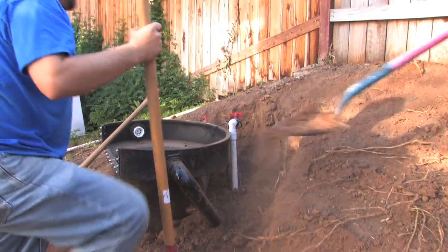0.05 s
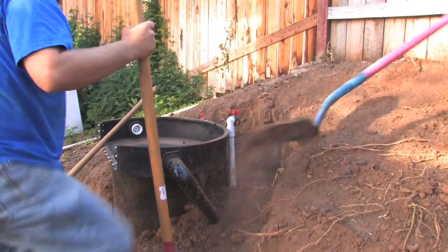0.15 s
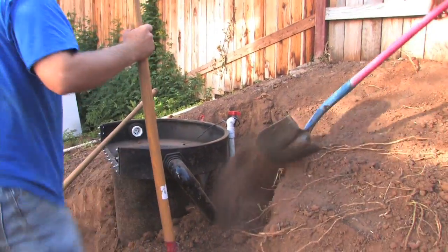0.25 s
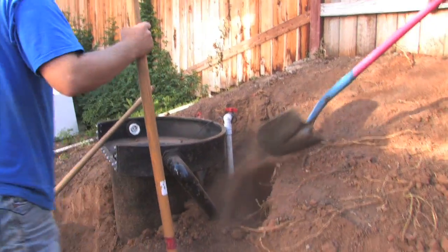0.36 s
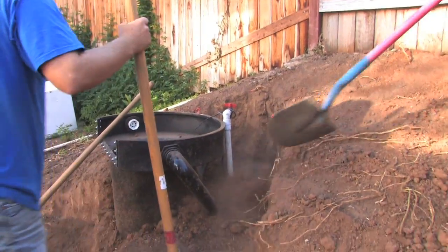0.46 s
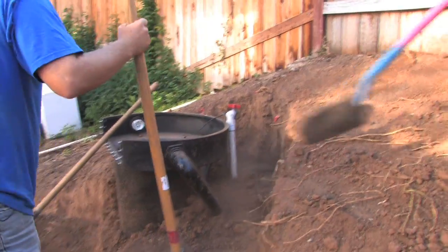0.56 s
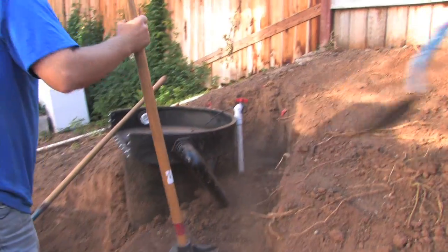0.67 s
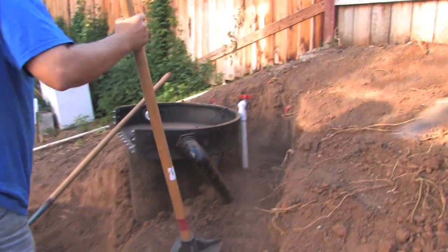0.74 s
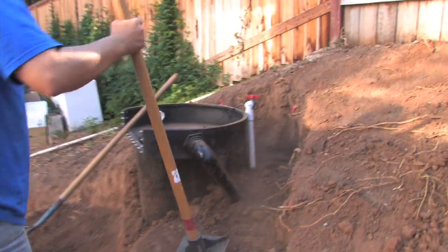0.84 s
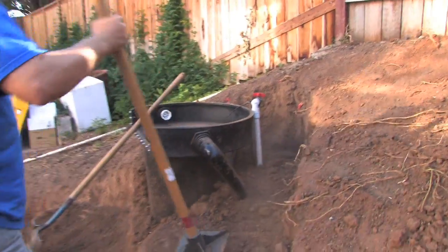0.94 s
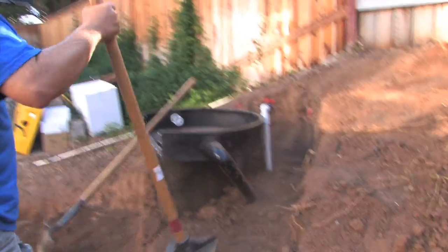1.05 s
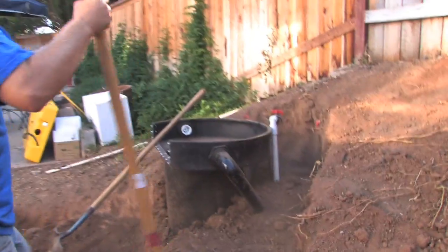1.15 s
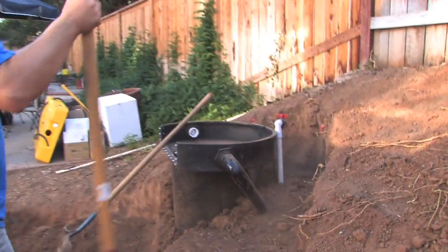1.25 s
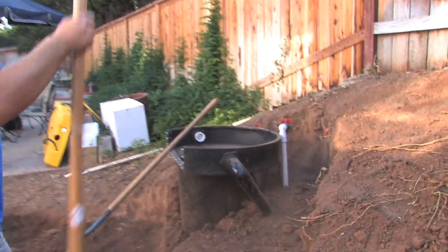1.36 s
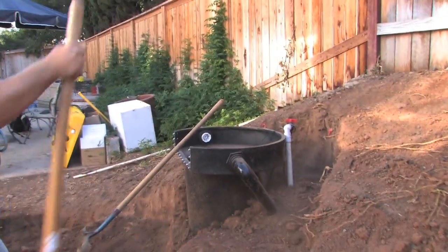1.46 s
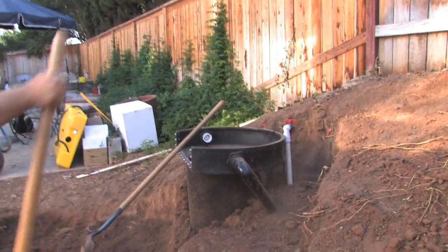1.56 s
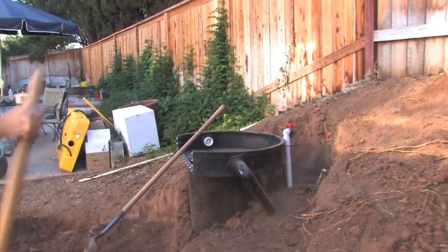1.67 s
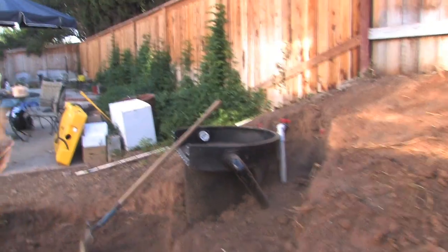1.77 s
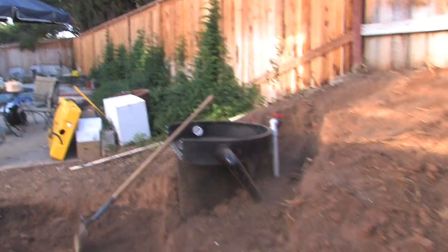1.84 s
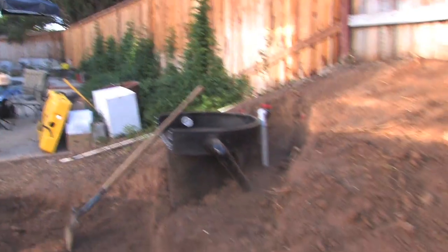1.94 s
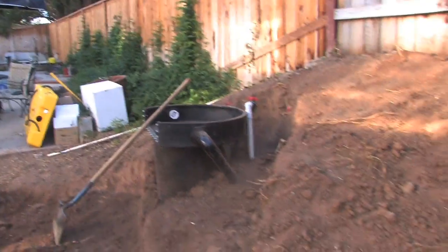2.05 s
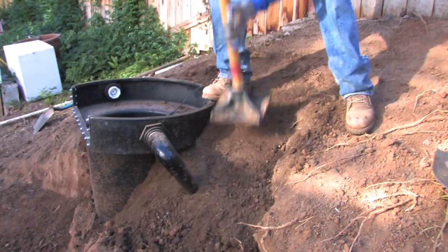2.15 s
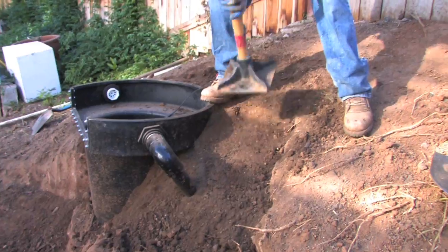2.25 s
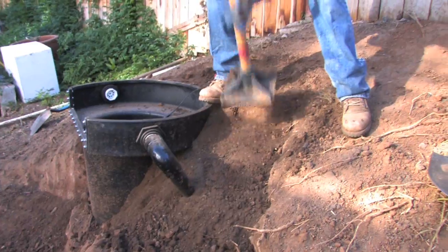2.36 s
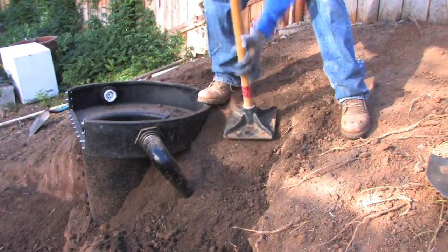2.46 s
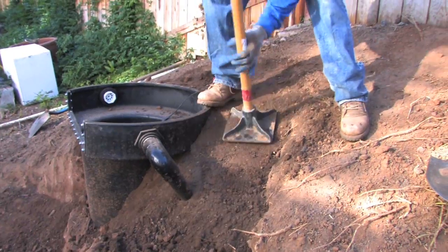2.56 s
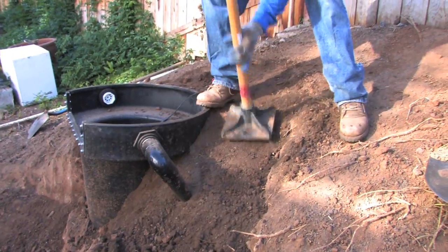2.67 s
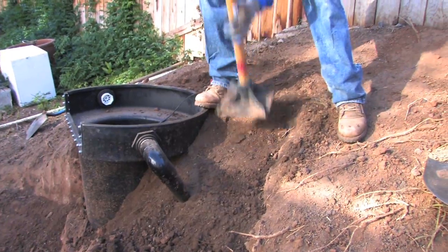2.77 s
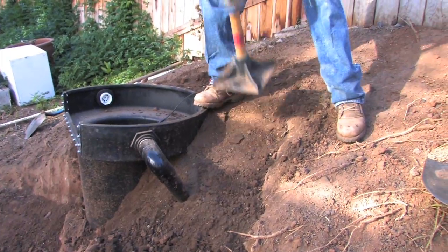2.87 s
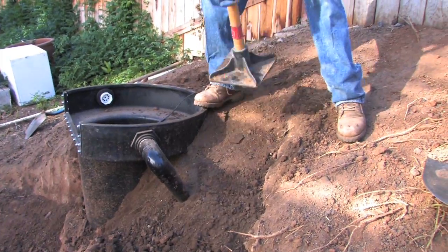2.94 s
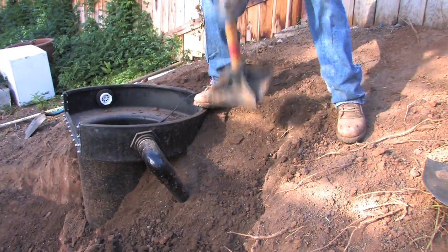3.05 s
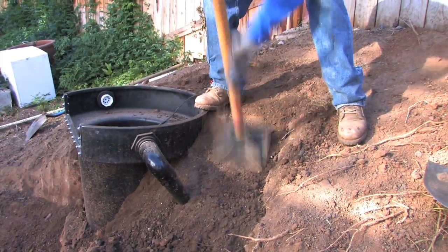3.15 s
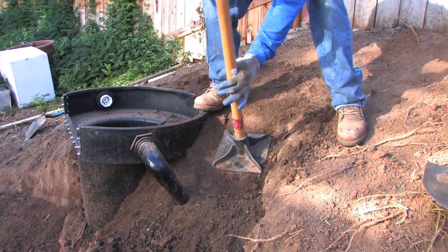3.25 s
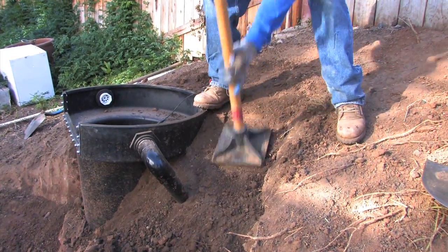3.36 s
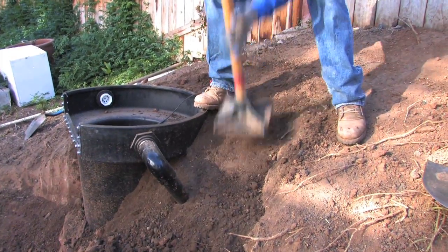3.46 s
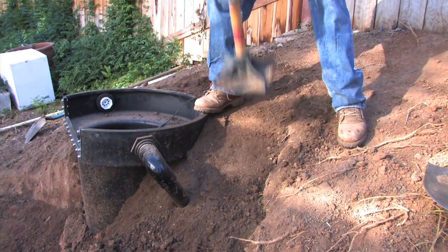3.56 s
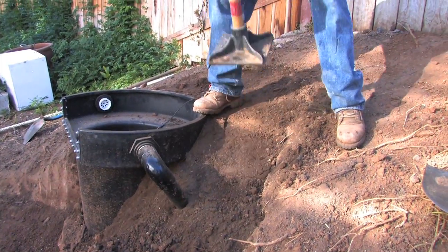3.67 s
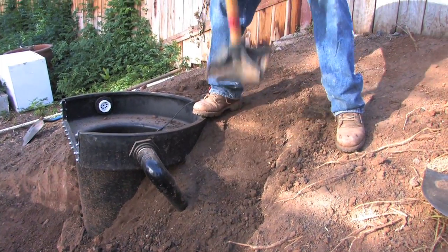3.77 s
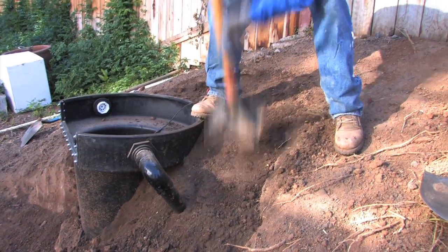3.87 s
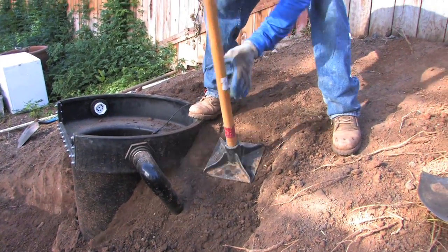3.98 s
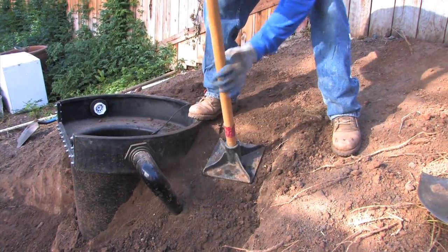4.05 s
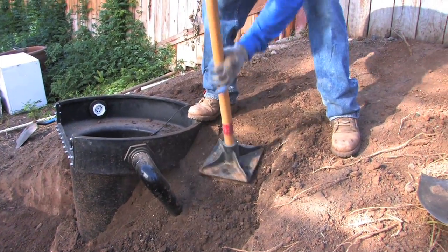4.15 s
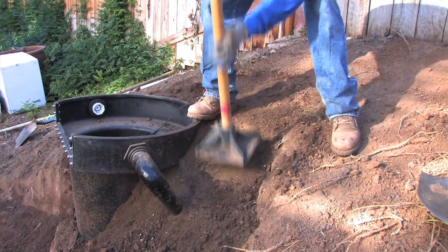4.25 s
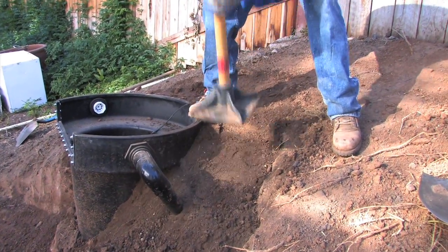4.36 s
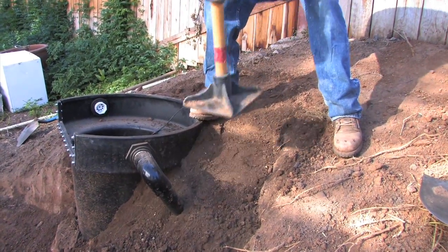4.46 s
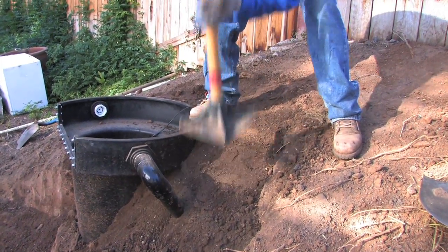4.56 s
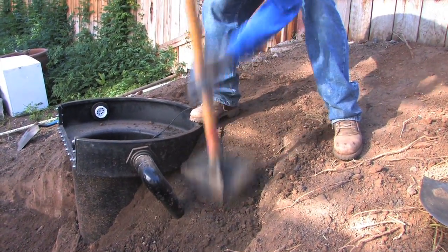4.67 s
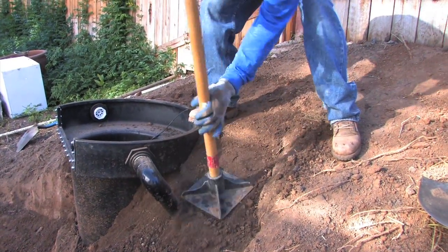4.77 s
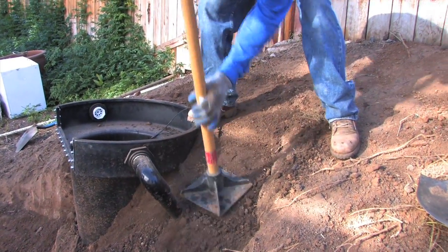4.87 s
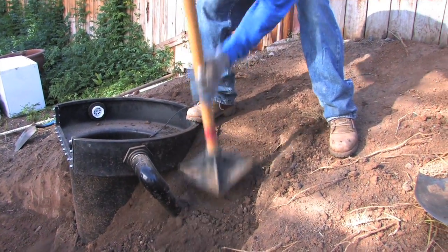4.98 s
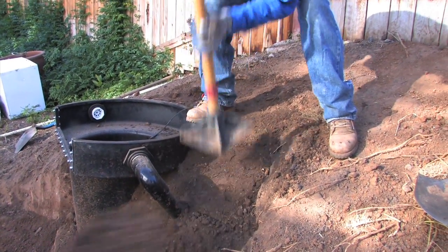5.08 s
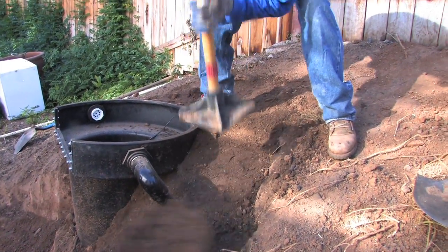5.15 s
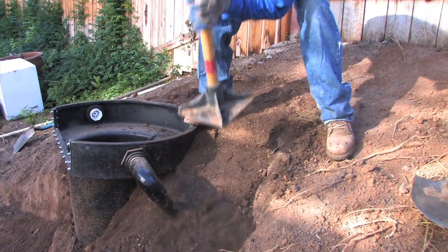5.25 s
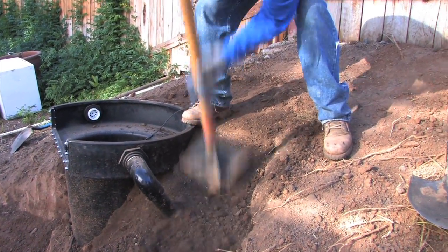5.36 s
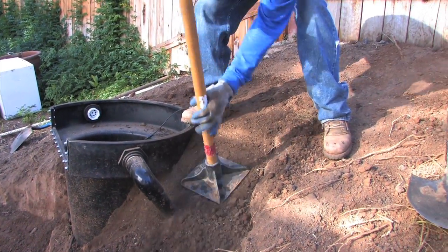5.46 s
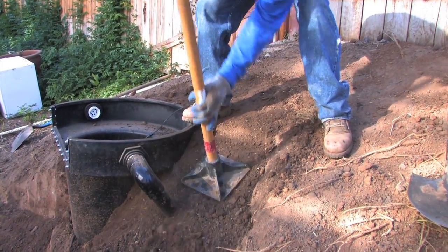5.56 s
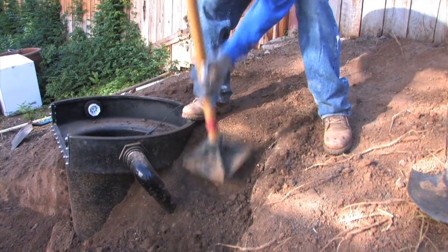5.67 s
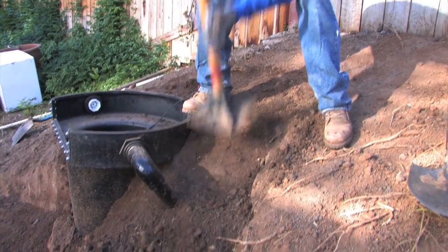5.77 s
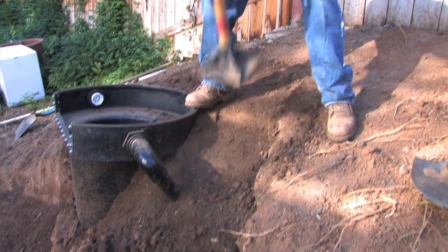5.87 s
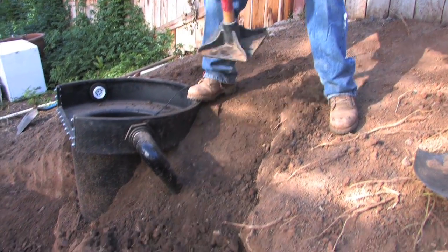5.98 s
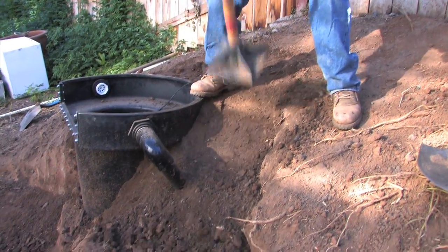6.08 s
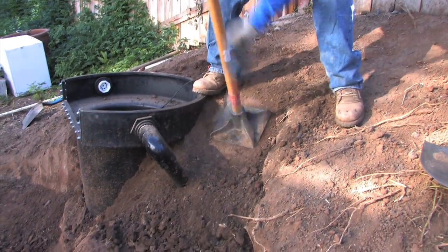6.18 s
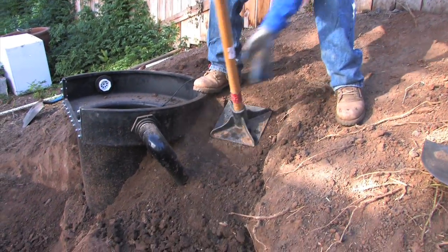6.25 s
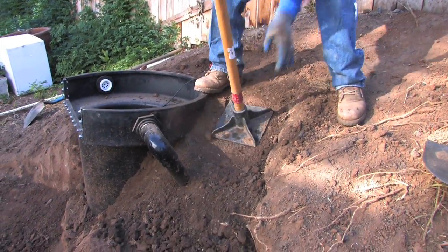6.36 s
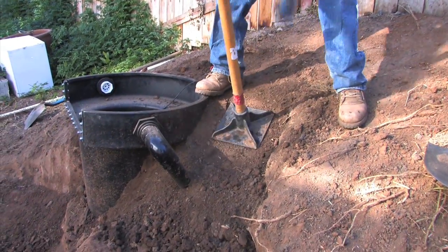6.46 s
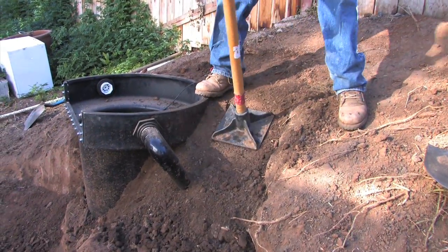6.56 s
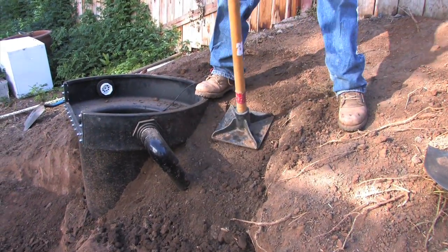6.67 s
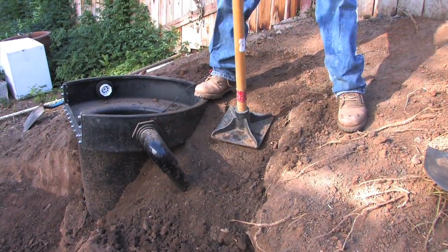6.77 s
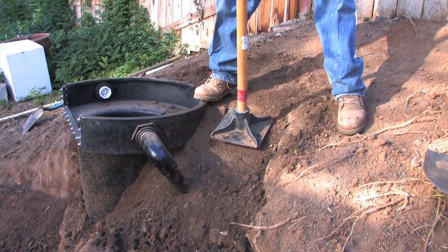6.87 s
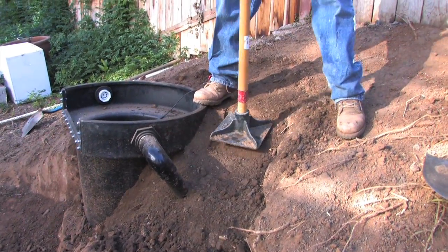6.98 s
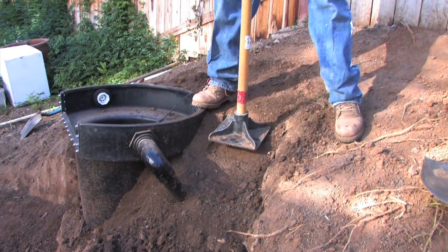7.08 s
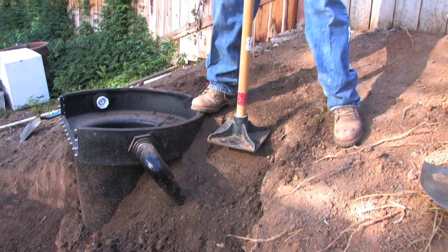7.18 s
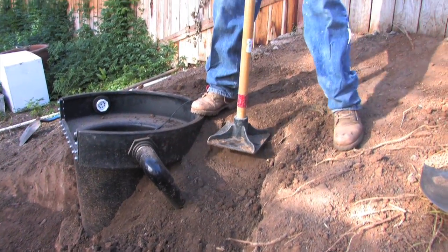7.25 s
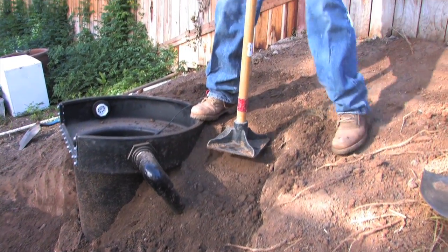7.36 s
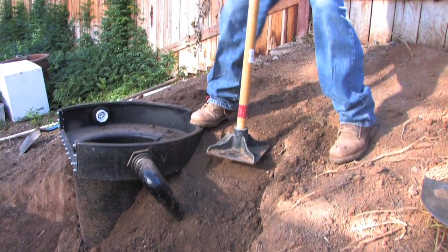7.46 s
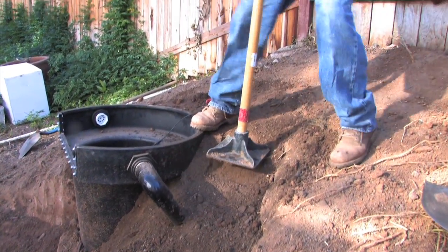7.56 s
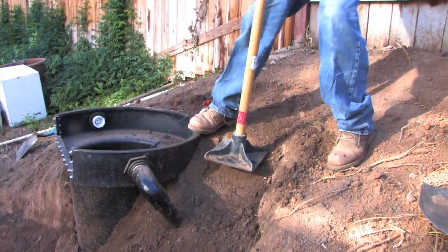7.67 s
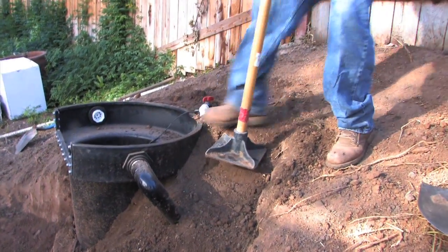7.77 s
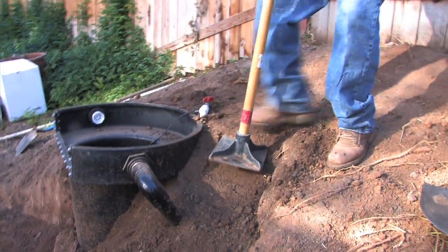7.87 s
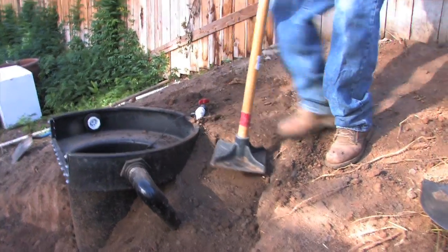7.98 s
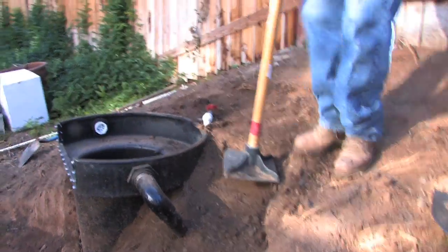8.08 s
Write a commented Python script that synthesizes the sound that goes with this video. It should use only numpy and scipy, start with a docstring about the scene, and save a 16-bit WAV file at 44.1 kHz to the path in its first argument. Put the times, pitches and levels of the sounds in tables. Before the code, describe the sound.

In an open fenced yard, a few steps from the microphone, a shovelful of soil pours with clinks and one hard woody knock, then the blade bites grittily into the heap. Around two seconds the digging wash stops and a heavy hand tamper thuds about every three-quarters of a second, a buried hollow tank booming beneath each blow. Sand trickles, gloves rustle, and finally the steel plate clanks and scuffs over grit.

```python
"""Backfilling around a buried tank

A fenced yard, heard from a few steps away, around a hollow plastic tank in a trench.
A shovel tips soil, clinks, knocks and bites into the heap: blade modes, shaped noise and clumped grains.
Then a steel hand tamper thuds on loose fill; noise and decaying modes make the tank boom, and sand trickles.
The plate clanks and scuffs over grit, mostly late; throughout, a faint whine and a soft hiss come and go."""
import sys
import numpy as np
from scipy import signal
from scipy.fft import rfft, irfft, next_fast_len
from scipy.io import wavfile
from scipy.ndimage import uniform_filter1d

SR = 44100
rng = np.random.default_rng(int(sys.argv[2]) if len(sys.argv) > 2 else 0)


def wav_record(signal):
    """Record a signal, one row per channel, as 16-bit PCM in the file named by sys.argv[1]."""
    frames = np.transpose(np.atleast_2d(signal))
    bounded = np.clip(frames, -1, 1)
    # unit amplitude maps onto the largest positive 16-bit level
    quanta = np.round(bounded * 32767).astype(np.int16)
    wavfile.write(sys.argv[1], SR, quanta)


N = 358170
AGE = np.arange(SR) / SR   # seconds since an event began


def from_db(db):
    """Decibels to gain."""
    return 10 ** (np.asarray(db) / 20)


def rms_one(x):
    """Scale to rms 1."""
    return x / np.sqrt(np.mean(x ** 2) + 1e-20)


def in_time(rows):
    """The columns of a curve at every sample."""
    s, *columns = np.transpose(rows)
    return [np.interp(np.arange(N) / SR, s, c) for c in columns]


def add(track, s, sound):
    """Mix a sound into a track from time s."""
    start = max(round(s * SR), 0)
    track[start:start + len(sound)] += sound[:max(N - start, 0)]


def decay(t60, hold=0):
    """Full level for a while, then 60 dB down in t60."""
    return from_db(-60 * np.maximum(AGE - hold, 0) / t60)


def swell(rise):
    """A straight rise to full level."""
    return np.minimum(AGE / rise, 1)


def coloured(x, spectrum, tilt_db=0):
    """Give white noise or grains a spectrum, tilted per octave; rms 1."""
    hz, db = np.transpose(spectrum)
    size = next_fast_len(len(x))
    octave = np.log2(np.maximum(np.fft.rfftfreq(size, 1 / SR), 1))
    level_db = np.interp(octave, np.log2(hz), db)
    # the tilt acts only above the second point; below the first the level falls 20 dB per octave
    level_db += tilt_db * np.maximum(octave, np.log2(hz[1]))
    level_db -= 20 * np.maximum(np.log2(hz[0]) - octave, 0)
    return rms_one(irfft(rfft(x, size) * from_db(level_db), size)[:len(x)])


def noise(spectrum, size=SR):
    """Smooth noise with a spectrum; rms 1."""
    return coloured(rng.standard_normal(size), spectrum)


def grains(per_s, spread_db, size=SR):
    """Random tiny collisions, many small and a few large; rms 1."""
    sizes = from_db(spread_db * np.minimum(rng.exponential(1, size), 4))
    happens = rng.random(size) < per_s / SR
    return rms_one(sizes * rng.choice([-1, 1], size) * happens)


def clumps(spread_db, size=SR):
    """Soil gives way in lumps: a gain that lurches every few milliseconds."""
    lurch = uniform_filter1d(rng.standard_normal(size), size=240)
    lurch = uniform_filter1d(lurch, size=120)
    return from_db(spread_db * rms_one(lurch))


def struck(modes):
    """A body's modes ringing, each strength depending a little on where the blow lands."""
    out = np.zeros(SR)
    for strength_db, (hz, db, t60) in zip(rng.uniform(-2, 2, len(modes)), modes):
        out += from_db(strength_db + db) * np.sin(2 * np.pi * hz * AGE) * decay(t60)
    return out


def shove(contact, order=8):
    """A brief push on the ground, the curvature of a skewed hump: a dip, then a crest of height 1."""
    t = AGE * np.sqrt(2 * order) / contact   # the crest follows the dip by about `contact`
    pressure = -np.gradient(np.gradient(t ** order * np.exp(-t)))
    return pressure / pressure.max()


WASH_END_S, WASH_FADE_DB_PER_S = 2.16, 153


def before_drop():
    """Gain 1 until 2.16 s, then fading quickly."""
    return from_db(-WASH_FADE_DB_PER_S * np.maximum(np.arange(N) / SR - WASH_END_S, 0))


# Open air of the yard. Each row: frequency in Hz, relative density in dB per Hz.
AIR_SPECTRUM = [(40, -18), (130, 3.5), (220, 3), (450, 3.5), (1000, -1.5), (1500, -20), (2500, -32.5),
                (6000, -38.5), (16000, -34)]
# Broad outdoor wash of the first seconds. Each row: frequency in Hz, relative density in dB per Hz.
WASH_SPECTRUM = [(40, -6), (95, 1), (132, 9), (170, -4), (280, 0), (480, -2), (900, -8), (1500, -16),
                 (2500, -27), (6000, -36), (16000, -42.5)]
# Distant low rumble. Each row: frequency in Hz, relative density in dB per Hz.
RUMBLE_SPECTRUM = [(20, -26.5), (45, -19), (62, -3), (78, -1.5), (105, -5.5), (160, -10.5), (300, -23.5),
                   (1000, -70)]
AIR_DB, WASH_DB, RUMBLE_DB = -61, -45.5, -52.5


def yard():
    """Steady noise of open air and a distant rumble, with a broader wash that drops away at 2.16 s."""
    air = from_db(AIR_DB) * noise(AIR_SPECTRUM, size=N)
    wash = from_db(WASH_DB) * before_drop() * noise(WASH_SPECTRUM, size=N)
    return air + wash + from_db(RUMBLE_DB) * noise(RUMBLE_SPECTRUM, size=N)


# Spells of soft high hiss. Each row: start in seconds, length in seconds, level in dB.
HISS_SPELLS = [(1.112, 0.426, -54), (1.71, 0.464, -57.5), (7.285, .25, -65)]
# Treble of the hiss. Each row: frequency in Hz, relative density in dB per Hz.
HISS_SPECTRUM = [(4500, -19), (6000, -8), (7500, -6), (9500, -3.5), (11800, -2.5), (13000, -12),
                 (16000, -12)]
HISS_RISE_S, HISS_T60_S = 0.025, 0.15


def hiss():
    """A smooth band of treble noise that comes and goes."""
    out = np.zeros(N)
    for s, length, db in HISS_SPELLS:
        spell = swell(HISS_RISE_S) * decay(HISS_T60_S, hold=length)
        add(out, s, from_db(db) * noise(HISS_SPECTRUM) * spell)
    return out


# One long glide of a thin high whine. Each row: time in seconds, pitch in Hz before smoothing.
WHINE_GLIDE = [(6.16, 6800), (6.25, 9300), (6.39, 9950), (6.505, 11140), (6.60, 10100), (6.685, 10970),
               (6.81, 9700), (6.89, 8700), (6.96, 6200)]
# Brief faint swoops of the same whine.
# Each row: time of the top in seconds, top pitch in Hz, level in dB relative to the long glide.
WHINE_SWOOPS = [(.77, 8900, -3), (2.64, 9000, -3), (7.35, 9500, -5.5)]
SWOOP_RISE_S, SWOOP_FALL_S = 0.11, 0.24   # time constants of the bell-shaped pitch arc


def whine_course():
    """Pitch and level offset: one long rounded glide and a few bell-shaped swoops."""
    hz, db = uniform_filter1d(in_time(WHINE_GLIDE)[0], size=1800), np.zeros(N)
    for s, top_hz, swoop_db in WHINE_SWOOPS:
        lag = np.arange(N) / SR - s
        arc = top_hz * np.exp(-(lag / np.where(lag < 0, SWOOP_RISE_S, SWOOP_FALL_S)) ** 2)
        db = np.where(arc > hz, swoop_db, db)
        hz = np.maximum(hz, arc)
    return hz, db


# Partials of the whine. Each row: multiple of the pitch, relative level in dB.
WHINE_CLUSTER = [(1, -1), (1.104, -7), (1.18, -15), (1.225, -14), (1.27, -9), (1.311, -18)]
WHINE_DB, WHINE_AT_HZ, WHINE_DB_PER_OCTAVE = -54.5, 9980, 34


def whine(silent_hz=7000, full_hz=8200):
    """A faint cluster of high partials gliding together, slightly unsteady, louder as it climbs."""
    hz, offset_db = whine_course()
    level_db = WHINE_DB + offset_db + WHINE_DB_PER_OCTAVE * np.log2(hz / WHINE_AT_HZ)
    gain = from_db(level_db) * np.interp(hz, [silent_hz, full_hz], [0, 1])
    flutter = rms_one(uniform_filter1d(rng.standard_normal(N), size=100))
    phase = 2 * np.pi * np.cumsum(hz * (1 + 0.00377 * flutter)) / SR
    cluster = np.zeros(N)
    for multiple, db in WHINE_CLUSTER:
        cluster += from_db(db) * clumps(1.96, size=N) * np.sin(multiple * phase)
    return gain * cluster


# Boots on soft ground nearby. Each row: start in seconds, level in dB.
BOOT_STEPS = [(0.043, -24), (.060, -35), (0.704, -37.5), (3.838, -57), (3.915, -44), (5.286, -36.5),
              (5.361, -40.5), (5.407, -45.5), (6.714, -41), (6.804, -43.5)]
# Puff of a step. Each row: frequency in Hz, relative density in dB per Hz.
STEP_SPECTRUM = [(70, -59), (200, -10), (470, 2), (700, -9), (1300, -23), (3000, -34), (9000, -50)]


def boots():
    """Dull, short pats on the soft ground: one small push and a puff of noise."""
    out = np.zeros(N)
    for s, db in BOOT_STEPS:
        push = from_db(-0.5) * shove(0.0019)
        puff = from_db(-3.5) * noise(STEP_SPECTRUM) * swell(0.0022) * decay(0.086, hold=0.0021)
        add(out, s, from_db(db) * (push + puff))
    return out


# A shovelful of sand pouring into the trench. Each row: time in seconds, level in dB.
SAND_POUR = [(0, -48.5), (.3, -41), (.55, -42.5), (.8, -69.5)]
SAND_REST_DB, SAND_EARLY_DB = -63, -57   # steady trickle, and a louder floor added before 2.16 s that drops away with the wash
SPILL_RISE_S = 0.04   # disturbed sand takes a moment to start running
# spill levels relative to the event that sets the sand running
BITE_SPILL_DB, BITE_SPILL_T60_S = -20.5, 1.43
CLANK_SPILL_DB, CLANK_SPILL_T60_S = -23, 1
SCUFF_SPILL_DB, SCUFF_SPILL_T60_S = -11, 1
STEP_SPILL_DB, STEP_SPILL_T60_S = -20.5, 0.51
TAMP_SPILL_DB, TAMP_SPILL_T60_S = -65.5, 1   # not relative: alike for every blow


def sand_flow():
    """Bites, clanks, scuffs, steps and blows add spills, in power, to the pour and a steady trickle."""
    pour_db, = in_time(SAND_POUR)
    early_power = from_db(pour_db) ** 2 + from_db(SAND_EARLY_DB) ** 2
    power = from_db(SAND_REST_DB) ** 2 + early_power * before_drop() ** 2
    spills = [(s, db + BITE_SPILL_DB, BITE_SPILL_T60_S) for s, db, *_ in HEAP_BITES]
    spills += [(s, db + CLANK_SPILL_DB, CLANK_SPILL_T60_S) for s, db, *_ in PLATE_CLANKS]
    spills += [(s, db + SCUFF_SPILL_DB, SCUFF_SPILL_T60_S) for s, db, *_ in GRIT_SCUFFS]
    spills += [(s, TAMP_SPILL_DB, TAMP_SPILL_T60_S) for s, *_ in TAMPER_BLOWS]
    for s, db, t60 in spills:
        run = swell(SPILL_RISE_S) * decay(t60, hold=SPILL_RISE_S)
        add(power, s, (from_db(db) * run) ** 2)
    for s, db in BOOT_STEPS:
        add(power, s, (from_db(db + STEP_SPILL_DB) * decay(STEP_SPILL_T60_S)) ** 2)
    return np.sqrt(power)


# Fine sliding sand. Each row: frequency in Hz, relative density in dB per Hz.
SAND_SPECTRUM = [(400, 11.5), (1500, 10.5), (2300, 6.5), (5000, 2), (7000, 0), (11000, -0.5), (16000, -3.5)]
# Single pebbles ticking. Each row: start in seconds, level in dB, t60 in seconds.
PEBBLE_TICKS = [(0.1141, -28, 0.011), (.245, -25.5, .007), (0.923, -30, 0.017), (1.6625, -17.5, 0.0026),
                (1.791, -41, .008), (4.577, -46, .015), (7.47, -24.5, .011)]
# Tick of a pebble or a catching grip. Each row: frequency in Hz, relative density in dB per Hz.
TICK_SPECTRUM = [(300, 2), (1200, 0.5), (2800, 8), (4000, 0.5), (6500, 2.5), (8500, -9.5), (16000, -17)]


def loose_soil():
    """Sand slides in fine grains while single crumbs and pebbles tick."""
    sand = coloured(grains(7600, 2.7, size=N), SAND_SPECTRUM)
    out = sand_flow() * sand * clumps(0.65, size=N)
    for s, db, t60 in PEBBLE_TICKS:
        add(out, s, from_db(db) * noise(TICK_SPECTRUM) * decay(t60))
    return out


# The grip slides along the handle and catches.
# Each row: time of the catch in seconds, slide length in seconds, slide level in dB, catch level in dB.
GRIP_SHIFTS = [(3.429, 0.092, -59.5, -40.5), (4.222, 0.073, -56, -42.5), (4.393, .13, -56, -44),
               (4.449, 0.047, -59, -51), (5.066, 0.16, -61, -42.5), (5.852, 0.23, -63, -54),
               (6.055, 0.053, -59.5, -46.5)]
# Rustle of the sliding grip. Each row: frequency in Hz, relative density in dB per Hz.
RUB_SPECTRUM = [(800, 5), (1500, 10), (2100, 2), (2900, 6.5), (4300, 5.5), (5500, -18), (6900, 10),
                (7900, -25), (16000, -3)]
CATCH_T60_S = 0.05


def gloves():
    """Short, uneven rustles of grains as the grip shifts, each with a small catch as it ends."""
    out = np.zeros(N)
    for s, length, slide_db, catch_db in GRIP_SHIFTS:
        rustle = coloured(grains(3000, 4.2), RUB_SPECTRUM) * clumps(3.8)
        rustle = rustle * swell(length / 2) * decay(0.2, hold=length)
        add(out, s - length, from_db(slide_db) * rustle)
        add(out, s, from_db(catch_db) * noise(TICK_SPECTRUM) * decay(CATCH_T60_S))
    return out


# The tamper is lifted. Each row: start in seconds, level in dB.
LIFTS = [(5.075, -40.5)]
# Modes of the lifted tamper. Each row: frequency in Hz, level in dB, t60 in seconds.
LIFTED_STEEL = [(1555, 0, 0.26), (4400, -11.5, 0.25)]


def faint_ring():
    """A brief, faint metallic note of two modes as the tamper is lifted."""
    out = np.zeros(N)
    for s, db in LIFTS:
        add(out, s, from_db(db) * struck(LIFTED_STEEL) * swell(0.02))
    return out


# Grit on steel. Each row: frequency in Hz, relative density in dB per Hz.
GRIT_SPECTRUM = [(150, -14.5), (500, -3), (1000, -1), (2000, -1.5), (3200, -3), (5000, -5), (9000, -5),
                 (13000, -10), (16000, -17)]


def scrapes(strokes, modes, lumpy_db):
    """Grit rasps along steel: clumped grains, heard directly and through the metal's modes."""
    out = np.zeros(N)
    for s, db, rise, hold, t60, tilt_db, ring_db in strokes:
        stroke = swell(rise) * decay(t60, hold) * clumps(lumpy_db)
        rasp = coloured(grains(4500, 3.6), GRIT_SPECTRUM, tilt_db) * stroke
        ringing = signal.fftconvolve(rasp, struck(modes))[:SR]
        ringing = rms_one(ringing) * np.std(rasp)   # as strong as the rasp
        add(out, s, from_db(db - 3) * (rasp + from_db(ring_db) * ringing))
    return out


# The shovel bites into the heap. Each row: start in seconds, level in dB (scraped 3 dB lower),
# t60 in seconds, brightness in dB per octave.
HEAP_BITES = [(.879, -35.5, 0.42, -4.5), (1.376, -27.5, .19, -2), (1.742, -26, 0.25, -0.7),
              (1.79, -30.5, 0.15, -1)]
BITE_RISE_S, BITE_HOLD_S, BITE_RING_DB = 0.0009, 0.012, -7.5
# Soil slides along the blade. Each row: start in seconds, level in dB (scraped 3 dB lower),
# length in seconds, brightness in dB per octave, metal ring in dB relative to the rasp.
SOIL_SLIDES = [(0.217, -43.5, 0.11, -2, 7), (0.268, -33, .12, 2, -2), (.895, -31, 0.033, 3, -15),
               (1.199, -49, 0.11, -1.5, -15)]
SLIDE_RISE_SHARE, SLIDE_T60_S = 0.68, 0.24   # the rise is a share of the length
# Shovel blade. Each row: frequency in Hz, level in dB, t60 in seconds.
BLADE_MODES = [(948, -11.5, 0.18), (1555, -5, 0.071), (1820, -11, 0.088), (2280, -11, 0.102),
               (3340, -5.5, 0.057), (4000, -5, 0.044), (4240, -19, 0.14), (4694, -28, 0.26),
               (5070, -24, 0.16), (5410, -3.5, 0.058), (6000, -3, .08), (7100, -14.5, 0.076),
               (8070, -5, .06), (10540, -1, 0.049), (11080, -12, 0.045), (14000, -4, 0.087),
               (14400, -9, .05)]


def blade_scrapes():
    """A bite starts at once and dies away; sliding soil swells for most of its length."""
    strokes = []
    for s, db, t60, tilt_db in HEAP_BITES:
        strokes.append((s, db, BITE_RISE_S, BITE_HOLD_S, t60, tilt_db, BITE_RING_DB))
    for s, db, length, tilt_db, ring_db in SOIL_SLIDES:
        rise = SLIDE_RISE_SHARE * length
        strokes.append((s, db, rise, length, SLIDE_T60_S, tilt_db, ring_db))
    return scrapes(strokes, BLADE_MODES, lumpy_db=3.0)


# Stones on the blade. Each row: start in seconds, level in dB.
STONE_CLINKS = [(0.172, -36.5), (0.197, -24)]
# Hard knocks of shovel and falling clods. Each row: start in seconds, level in dB.
HARD_KNOCKS = [(.552, -12), (.625, -27), (.642, -46), (.696, -40), (.749, -40.5)]
# Crack of a knock. Each row: frequency in Hz, relative density in dB per Hz.
KNOCK_SPECTRUM = [(150, -44), (350, -26), (560, -3), (800, -0.5), (1100, 1), (1350, -7), (1900, -7),
                  (2700, -20), (4200, -18.5), (5600, -28), (7500, -50), (16000, -42.5)]
# Woody body of a knock. Each row: frequency in Hz, level in dB, t60 in seconds.
KNOCK_BODY = [(586, -13.5, 0.23), (766, -3.5, 0.086), (931, -6, 0.053), (1130, 3, 0.059),
              (1518, -12.5, 0.023)]


def shovel():
    """Stones ring the blade; knocks are short and woody, duller when weak, with a faint fence tail."""
    out = np.zeros(N)
    for s, db in STONE_CLINKS:
        grit = from_db(-2) * noise(GRIT_SPECTRUM) * decay(0.038)
        add(out, s, from_db(db) * (struck(BLADE_MODES) + grit))
    for s, db in HARD_KNOCKS:
        crack = coloured(rng.standard_normal(SR), KNOCK_SPECTRUM, tilt_db=0.33 * (db + 11.5))
        fence_tail = from_db(-15.5) * decay(0.31)
        crack = crack * swell(0.00049) * (decay(0.048, hold=0.0025) + fence_tail)
        body = from_db(-7) * struck(KNOCK_BODY) * swell(0.0017)
        add(out, s, from_db(db) * (body + crack))
    return out


# The plate drops or rocks onto grit. Each row: start in seconds, grit level in dB (scraped 3 dB lower),
# plate ring level in dB, grit t60 in seconds, brightness in dB per octave.
PLATE_CLANKS = [(5.483, -32.5, -46, 0.086, -6.5), (6.337, -29.5, -31, 0.14, -5.5),
                (6.468, -34.5, -49, 0.12, -2.5), (7.396, -36, -36, 0.063, -4),
                (7.470, -31, -26.5, 0.36, -2.5), (7.553, -36.5, -35, 0.22, -2)]
CLANK_RISE_S, CLANK_HOLD_SHARE, CLANK_RING_DB = 0.0038, 0.1, -5.5   # grinds for a share of its t60
# Plate and boots scuff over grit. Each row: start in seconds, level in dB (scraped 3 dB lower),
# length in seconds, metal ring in dB relative to the rasp.
GRIT_SCUFFS = [(2.221, -52, 0.055, -12), (2.388, -51, 0.12, -21), (5.075, -47.5, 0.011, -14),
               (5.285, -54.5, 0.012, -12), (6.401, -42, 0.0078, -14), (6.94, -52, 0.067, -3.5),
               (7.406, -42.5, .04, -13), (7.744, -51, 0.064, 3.5), (7.826, -45.5, 0.036, -24),
               (7.98, -52, 0.054, -2), (8.067, -49.5, 0.067, 2)]
SCUFF_RISE_SHARE, SCUFF_T60_S, SCUFF_TILT_DB = 0.18, 0.27, -0.9   # share of the length; s; dB per octave
# Tamper plate. Each row: frequency in Hz, level in dB, t60 in seconds.
PLATE_MODES = [(503.5, -18.5, 0.43), (771, -16, 0.13), (938, -2, 0.038), (1504, 8.5, 0.031),
               (1555, -15.5, 0.26), (1740, -5.5, 0.026), (2162, -10.5, 0.17), (2740, -9, 0.023),
               (4080, -21, 0.28), (4560, -37, 0.098), (6450, -18, 0.058)]


def plate_scrapes():
    """A clank strikes the plate and grinds grit; a scuff swells and rasps, ringing without a strike."""
    clanks, scuffs = [], []
    for s, db, _, t60, tilt_db in PLATE_CLANKS:
        clanks.append((s, db, CLANK_RISE_S, CLANK_HOLD_SHARE * t60, t60, tilt_db, CLANK_RING_DB))
    for s, db, length, ring_db in GRIT_SCUFFS:
        rise = SCUFF_RISE_SHARE * length
        scuffs.append((s, db, rise, length, SCUFF_T60_S, SCUFF_TILT_DB, ring_db))
    out = scrapes(clanks, PLATE_MODES, lumpy_db=1.3) + scrapes(scuffs, PLATE_MODES, lumpy_db=2.0)
    for s, _, plate_db, *_ in PLATE_CLANKS:
        add(out, s, from_db(plate_db) * struck(PLATE_MODES))
    return out


def thud(contact, rebound_db, period=0.01046, rebound_s=0.0026, loss_db=-10):
    """The plate stops in the soil, then bobs twice more, softly, on the springy fill."""
    out = shove(contact)
    for k in range(2):
        phase = (AGE - 2 * contact - (k + 1) * period) / rebound_s
        bob = (1 - phase ** 2) * np.exp(-phase ** 2 / 2)
        out = out + from_db(rebound_db + k * loss_db) * bob
    return out


# Tamper blows. Each row: time in seconds, thud level in dB, contact in seconds,
# tank boom in dB and steel ring in dB, both relative to the thud.
TAMPER_BLOWS = [(1.9541, -17.5, 0.0029, -1.5, -40), (2.5394, -17, 0.0012, 0.5, -40),
                (3.2447, -6.5, 0.0026, -1, -5), (4.0167, -2, 0.0015, 4, -4.5),
                (4.7954, -11.5, 0.0032, -1, -17), (5.494, -6.5, 0.0027, -1, -1.5),
                (6.2723, -2.5, 0.0022, -1, 4)]
# Hollow tank. Each row: frequency in Hz, level in dB, t60 in seconds.
TANK_MODES = [(105.6, -32.5, 0.87), (119.2, -23, 0.64), (125, -39, 0.43), (182, -18, 0.22),
              (212.7, -13, 0.058), (291, -30, 0.39), (316.8, -19.5, 0.19), (399, -37, 0.15),
              (458, -15, 0.06), (476, -39, 0.32), (570, -61, 0.15), (818, -23, 0.066), (1110, -54, 0.19),
              (1587, -41, 0.071)]
# Thin ring of the steel head. Each row: frequency in Hz, level in dB, t60 in seconds.
STEEL_MODES = [(8700, -46.5, 0.27), (12000, -43, 0.2), (12300, -49, 0.11), (14540, -30, 0.16),
               (14600, -30, 0.12)]
# Slap of plate on soil. Each row: frequency in Hz, relative density in dB per Hz.
SLAP_SPECTRUM = [(150, -31), (260, -16), (430, 3), (620, -3.5), (950, -8), (1400, -20.5), (2200, -35.5),
                 (4000, -38), (9000, -77)]
# Crumbs crushed under the plate. Each row: frequency in Hz, relative density in dB per Hz.
CRUNCH_SPECTRUM = [(300, -29), (800, 1), (1500, 4.5), (2600, -6.5), (5000, -7.5), (10000, -19),
                   (16000, -21)]
# Low boom of the tank. Each row: frequency in Hz, relative density in dB per Hz.
BOOM_SPECTRUM = [(40, -23), (70, -4.5), (120, -1), (150, -5.5), (200, -8), (300, -19.5), (450, -24),
                 (900, -33), (1600, -46), (4000, -63.5)]
# Mids scattered off the fence. Each row: frequency in Hz, relative density in dB per Hz.
ECHO_SPECTRUM = [(120, -30), (200, 6.5), (300, 6.5), (450, -4), (900, -10.5), (1600, -34), (4000, -55)]
REBOUND_DB, REBOUND_DB_PER_DB = -4.5, -0.07   # lighter blows bounce relatively more
# the shorter the contact, the louder the slap
SLAP_DB, SLAP_CONTACT_S, SLAP_DB_PER_OCTAVE = -13, 0.0023, -6
# the plate meets a pebble just before it seats
PEBBLE_LEAD_S, PEBBLE_DB, PEBBLE_FOLLOWS = 0.0082, -45.5, 0.35
# crumbs crush nearly alike under every blow, more under a short contact
CRUNCH_DB, CRUNCH_FOLLOWS, CRUNCH_DB_PER_OCTAVE = -35.5, 0.11, -3


def tamper():
    """Each blow thuds, slaps and crushes the soil, shakes the buried tank and sets the steel singing."""
    out = np.zeros(N)
    for s, db, contact, tank_db, ring_db in TAMPER_BLOWS:
        softness = np.log2(contact / SLAP_CONTACT_S)
        pebble_db = PEBBLE_DB + PEBBLE_FOLLOWS * db
        add(out, s - PEBBLE_LEAD_S, from_db(pebble_db) * struck(PLATE_MODES))

        rebound_db = REBOUND_DB + REBOUND_DB_PER_DB * db
        add(out, s - contact * 0.71, from_db(db) * thud(contact, rebound_db))

        slap_db = db + SLAP_DB + SLAP_DB_PER_OCTAVE * softness
        slap = noise(SLAP_SPECTRUM) * swell(0.0031) * decay(0.033, hold=0.0045)
        add(out, s - 0.003, from_db(slap_db) * slap)

        # loose crumbs are crushed just before the plate seats
        crunch_db = CRUNCH_DB + CRUNCH_FOLLOWS * db + CRUNCH_DB_PER_OCTAVE * softness
        crush = swell(0.0079) ** 2 * (decay(0.02, hold=0.0058) + from_db(-2.5) * decay(0.21))
        crumbs = coloured(grains(4000, 4.4), CRUNCH_SPECTRUM)
        add(out, s - 0.007, from_db(crunch_db) * crumbs * crush)

        # clear tank modes inside a long low boom; the mids scatter off the fence and die sooner
        boom = from_db(-20.5) * noise(BOOM_SPECTRUM) * swell(0.012) * decay(0.59)
        echo = from_db(-18) * noise(ECHO_SPECTRUM) * swell(0.032) * decay(0.22)
        add(out, s + 0.0011, from_db(db + tank_db) * (struck(TANK_MODES) + boom + echo))

        singing = struck(STEEL_MODES) * swell(0.018) * clumps(5.1)
        add(out, s + 0.013, from_db(db + ring_db) * singing)
    return out


def scene():
    """All the work, heard from a few steps away."""
    background = yard() + hiss() + whine() + boots() + loose_soil()
    digging = blade_scrapes() + shovel()
    tamping = gloves() + faint_ring() + plate_scrapes() + tamper()
    return (background + digging + tamping)[None, :]


CUTOFF_HZ = 16000


def record(dry):
    """One microphone channel: the loudest peaks flatten near full scale and the top is cut."""
    rounded = dry / (1 + dry ** 8) ** (1 / 8)
    top_cut = signal.ellip(10, 0.1, 80, CUTOFF_HZ, fs=SR, output="sos")
    return signal.sosfilt(top_cut, rounded)


dry = scene()
out = record(dry)
wav_record(out)
```